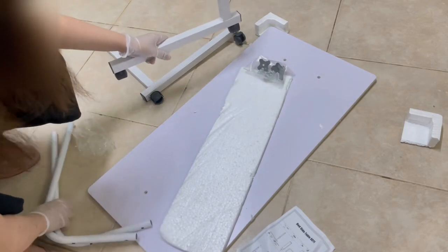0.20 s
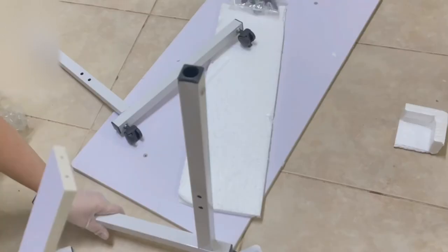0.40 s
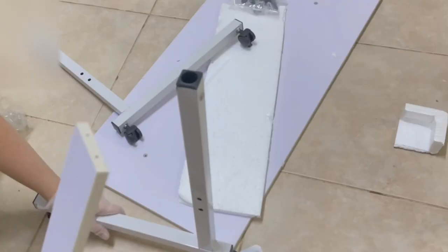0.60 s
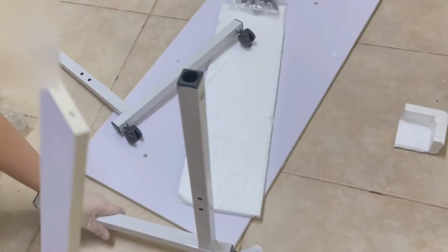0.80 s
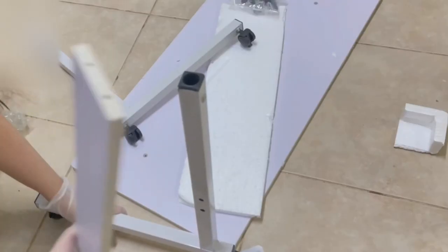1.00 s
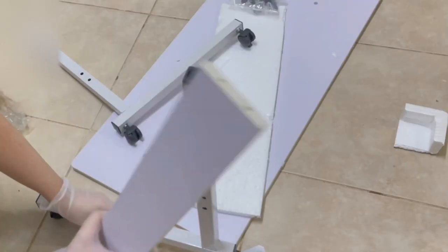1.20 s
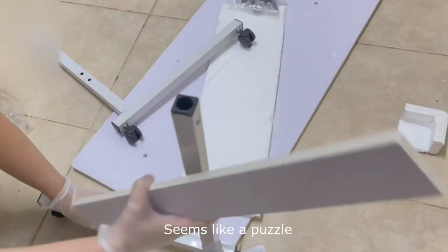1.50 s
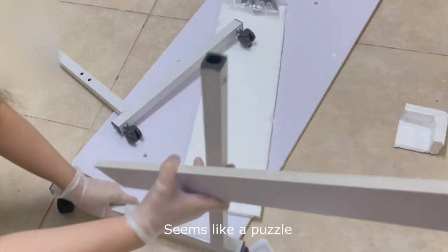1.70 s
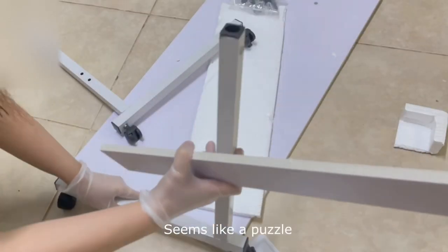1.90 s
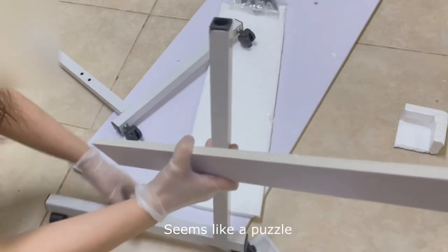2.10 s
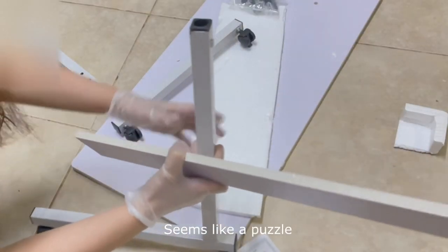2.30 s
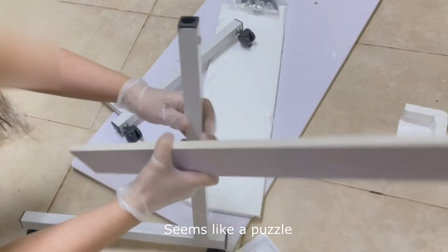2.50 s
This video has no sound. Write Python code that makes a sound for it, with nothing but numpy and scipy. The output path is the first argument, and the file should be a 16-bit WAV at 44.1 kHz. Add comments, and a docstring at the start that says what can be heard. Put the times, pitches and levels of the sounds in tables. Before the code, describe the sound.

Steel tubes clash with a bright ringing clank that stops short, then quiet panel taps and rubs

```python
"""A desk frame is put together on a tiled floor in a small hard room, close to the microphone.
Over room air and a faint steady hum a part shifts: contacts on the tiles ring its steel.
Two steel tubes clash and ring as decaying modes; the ring breaks off short. A low drone climbs in pitch.
Gloves slide (rough noise), then a panel is swung into place: it taps and rubs the leg and fittings click."""
import sys
import numpy as np
from scipy import signal
from scipy.fft import rfft, irfft, next_fast_len
from scipy.io import wavfile
from scipy.ndimage import map_coordinates

SR = 44100
rng = np.random.default_rng(int(sys.argv[2]) if len(sys.argv) > 2 else 0)


def materialize(psi):
    """Save the field psi as 16-bit PCM at rate SR to the path in sys.argv[1].

    A 1-D psi becomes a single channel; in a 2-D psi each row is a channel.
    """
    bounded = np.clip(np.atleast_2d(psi).T, -1, 1)
    quanta = np.round(bounded * 32767).astype(np.int16)
    wavfile.write(sys.argv[1], SR, quanta)


N = 114660
TOP_HZ = 15900

# spectrum of the tubes' dense clatter: f/Hz, level/dB
CLATTER_SPECTRUM = [(200, -20.5), (620, -10), (1300, -2), (1900, -9), (2500, -3), (3600, -4), (3850, -15),
                    (4250, -25), (4600, 1.5), (7400, -2), (8900, 4), (9900, -1), (10400, -28), (12200, -9),
                    (13200, -50)]
# spectrum of panel against leg, knocking or rubbing: f/Hz, level/dB
PANEL_SPECTRUM = [(120, -24), (750, -4.5), (1600, 2), (2900, 0), (4000, -9), (6000, -19), (9600, -20),
                  (10500, -55)]


def amp(db):
    """Amplitude factor of a level in dB."""
    return 10 ** (np.asarray(db) / 20)


def unit(x):
    """x scaled to rms 1."""
    return x / np.sqrt(np.mean(x ** 2) + 1e-20)


def along(points, hz):
    """(Hz, value) points interpolated on a log frequency axis."""
    f, v = np.transpose(points)
    return np.interp(np.log(hz + 1), np.log(f + 1), v)


def clock():
    """Time of each sample in s."""
    return np.arange(N) / SR


def filtered(x, response):
    """x times a response of frequency."""
    m = next_fast_len(N + SR // 2)
    hz = np.fft.rfftfreq(m, 1 / SR)
    return irfft(rfft(x, m) * response(hz), m)[..., :N]


def pan(left_db):
    """Channel gains with the left left_db above the right."""
    return amp(np.array([[left_db], [-left_db]]) / 2)


def noise(spectrum, alike):
    """Coloured stereo noise of rms 1; alike is the channel correlation."""
    mid, side = filtered(rng.standard_normal((2, N)), lambda hz: amp(along(spectrum, hz)))
    turn = np.arccos(np.clip(alike, 0, 1)) / 2
    return unit(np.cos(turn) * mid + np.sin(turn) * np.array([side, -side]))


def wobble(rate_hz):
    """A smooth random curve, rate_hz knots a second."""
    knots = rng.standard_normal(int(N * rate_hz / SR) + 4)
    return map_coordinates(knots, [clock() * rate_hz])


def struck(start_s, t60_s, attack_s=0.00027):
    """Envelope of a blow: a quick rise, then a steady decay."""
    t = np.maximum(clock() - start_s, 0)
    return (1 - np.exp(-t / attack_s)) * np.exp(-np.log(1000) * t / t60_s)


def friction(strokes, spectrum, rough_db):
    """Strokes that swell and fade, grainy from sticking and slipping."""
    t = clock()
    power = 0
    for peak_s, db, rise_s, fall_s in strokes:
        drop_db = 20 * np.maximum((peak_s - t) / rise_s, (t - peak_s) / fall_s)
        power = power + amp(db - drop_db) ** 2
    grain = amp(rough_db * wobble(rate_hz=400))
    return np.sqrt(power) * unit(noise(spectrum, alike=.6) * grain)


def room(x):
    """The room's answer: a noise tail, each frequency dying at its own speed."""
    # decay of the room: f/Hz, t60/s
    room_decay = [(150, 0.42), (1000, .42), (3000, .42), (9000, .28)]
    hz, t, z = signal.stft(rng.standard_normal((2, SR // 2)), SR, nperseg=256)
    decay = np.exp(-np.log(1000) * t / along(room_decay, hz)[:, None])
    tail = signal.istft(z * decay, SR, nperseg=256)[1]
    build_up = 1 - np.exp(-np.arange(tail.shape[1]) / SR / .004)
    tail = tail * build_up
    return signal.fftconvolve(x, tail / np.linalg.norm(tail[0]), axes=1)[:, :N]


def tubes():
    """Each contact rings the tubes' modes, with a crack and dense clatter; reflections make the lines waver."""
    # tube modes: f/Hz, level touched at the tip/dB, level struck full on/dB, t60/s, left over right/dB
    tube_modes = [(661, -45.5, -41, .6, 10), (1340, -42, -24, .35, 13.5), (1627, -32.5, -37, .4, 5.5),
                  (2183, -34.5, -32.5, 2.5, 7), (2417, -33, -23.5, 0.37, 2), (2453, -34, -28, .4, 1),
                  (2640, -30, -30, 0.53, 10), (3190, -46, -25.5, 1.0, 7), (3579, -21.5, -24.5, 0.58, 6),
                  (3620, -33, -26, 0.33, 10), (4560, -24.5, -21.5, .32, 2.5), (4651, -35, -26, .9, 6),
                  (5600, -27, -44, .2, 1), (6290, -47, -33, .4, 1), (6740, -49, -33, .6, 7),
                  (7527, -31.5, -33.5, 1.1, 2.5), (8103, -27, -21.5, .4, 0.5), (8690, -23.5, -33, .24, 0),
                  (8793, -30, -17.5, 0.47, -0.5), (9314, -18, -29, 0.18, 0), (9740, -25, -35, 0.32, 0),
                  (12110, -45, -30.5, .2, -0.5)]
    # tube contacts: t/s, level/dB, place (0 tip to 1 full on), clatter level/dB
    contacts = [(0.2116, 1, 0, -28), (0.2412, 1, 1, -21.5), (.267, -8, 0.82, -23), (.311, -15, 0.93, -29.5)]
    # thuds of the frame's weight: t/s, level/dB
    thud_events = [(.243, -24), (.312, -32)]
    # spectra of thud and crack: f/Hz, level/dB
    thud_spectrum = [(60, -20), (550, -6), (950, -7), (1350, 4), (1800, -9), (4000, -35)]
    crack_spectrum = [(500, -24), (3400, -3), (4200, -26), (8900, 0), (15800, -24)]
    crack_db, crack_t60_s = -17.5, 0.032
    wash_db = -3.5  # diffuse noise under the weak modes

    t, ring = clock(), np.zeros((2, N))
    for hz, tip_db, full_db, t60_s, left_db in tube_modes:
        power = 0
        for s, db, full, _ in contacts:
            mode_db = db + tip_db + full * (full_db - tip_db)
            power = power + (amp(mode_db) * struck(s, t60_s, attack_s=.0008)) ** 2
        phase = 2 * np.pi * (hz * t + rng.random()) + .22 * wobble(rate_hz=55) + rng.normal(0, .4, (2, 1))
        gains = pan(left_db) / pan(left_db).mean()
        ring += gains * np.sqrt(power) * amp(1.7 * wobble(rate_hz=60)) * np.sin(phase)

    clatter_power = sum((amp(db) * struck(s, t60_s=.42, attack_s=.0015)) ** 2 for s, _, _, db in contacts)
    clatter = unit(weak_modes() + amp(wash_db) * noise(CLATTER_SPECTRUM, alike=0.5))
    clatter = np.sqrt(clatter_power) * clatter
    crack = sum(amp(crack_db + db) * struck(s, crack_t60_s) for s, db, _, _ in contacts)
    crack = crack * noise(crack_spectrum, alike=.7)
    thud = sum(amp(db) * struck(s, t60_s=.09, attack_s=0.0022) for s, db in thud_events)
    thud = thud * noise(thud_spectrum, alike=0.53)
    return ring + pan(left_db=3) * (clatter + crack + thud)


def weak_modes():
    """A crowd of unevenly spaced partials of random strength."""
    spacing_hz = 54.94  # mean
    slots = np.arange(int(TOP_HZ / spacing_hz))
    place, size, turn = rng.random((len(slots), 3)).T
    lines = np.zeros(N // 2 + 1, complex)
    bins = ((slots + place) * spacing_hz * N / SR).astype(int)
    lines[bins] = size * np.exp(2j * np.pi * turn)
    return unit(filtered(irfft(lines, N), lambda hz: amp(along(CLATTER_SPECTRUM, hz))))


def taps():
    """The hand-damped panel knocks the leg: a very short ring and a crack; the fittings click."""
    # panel taps: t/s, ring level/dB, ring f/Hz, ring t60/s, crack level/dB
    tap_events = [(1.5732, -19, 2098, 0.0076, -38), (1.9865, -32.5, 1500, 0.01, -44.5),
                  (1.9905, -30, 2480, 0.016, -42), (2.174, -41, 2100, 0.0083, -56),
                  (2.3273, -28.5, 2290, 0.019, -53), (2.37, -34, 2380, 0.011, -45),
                  (2.430, -34.5, 4370, 0.013, -43), (2.4417, -25.5, 1860, 0.011, -31.5),
                  (2.446, -32, 2720, 0.018, -33.5), (2.4807, -28, 1317, 0.017, -29.5),
                  (2.485, -37.5, 650, 0.023, -36.5), (2.489, -44, 3150, 0.14, -38),
                  (2.535, -40, 1800, .007, -48)]
    # sharp clicks of the fittings: t/s, level/dB
    click_events = [(2.3274, -36.5), (2.442, -42), (2.481, -45)]
    # click spectrum: f/Hz, level/dB
    click_spectrum = [(1000, -22), (3500, 3), (6000, -7), (9600, 3.5), (13000, -38.5)]
    snap_room_db, ring_room_db = -4.5, -13

    t, ring = clock(), 0
    for s, db, hz, t60_s, _ in tap_events:
        ring = ring + amp(db) * struck(s, t60_s) * np.sin(2 * np.pi * hz * (t - s))
    crack = sum(amp(db) * struck(s, t60_s=0.016, attack_s=0.0004) for s, _, _, _, db in tap_events)
    crack = crack * noise(PANEL_SPECTRUM, alike=.9)
    clicks = sum(amp(db) * struck(s, t60_s=0.0222) for s, db in click_events)
    clicks = clicks * noise(click_spectrum, alike=.7)
    snap = pan(left_db=4.0) * (crack + clicks)
    return ring + snap + room(amp(snap_room_db) * snap + amp(ring_room_db) * ring)


def panel_rubs():
    """The panel rubs along the leg: rough friction noise."""
    # rubs: peak t/s, level/dB, rise/s per 20 dB, fall/s per 20 dB
    rub_strokes = [(1.585, -51.5, 0.069, 0.23), (1.997, -45.5, .008, 0.09), (2.162, -57.5, 0.028, 0.19),
                   (2.362, -50, 0.036, 0.22), (2.485, -48.5, 0.085, 0.02)]
    return friction(rub_strokes, PANEL_SPECTRUM, rough_db=2.5)


def glove_slides():
    """Gloves slide: smoother, brighter friction noise."""
    # slides: peak t/s, level/dB, rise/s per 20 dB, fall/s per 20 dB
    slide_strokes = [(.19, -54.5, 0.065, 0.15), (.868, -56.5, 0.014, 0.6), (.958, -48, 0.073, 0.06),
                     (1.088, -56, 0.11, 0.09), (1.555, -60, 0.031, 0.22), (1.71, -60.5, 0.15, 0.16),
                     (2.34, -54.5, 0.045, 0.43), (2.48, -56, 0.08, 0.27)]
    # glove spectrum: f/Hz, level/dB
    glove_spectrum = [(300, -12), (1500, -7.5), (4400, -3), (6800, -6), (9400, 4), (10200, -15),
                      (13000, -38)]
    return friction(slide_strokes, glove_spectrum, rough_db=1.0)


def shifting_part():
    """A quick run of contacts on the tiles rings the steel part as it drags."""
    # contacts on the floor: t/s, level/dB
    shift_events = [(0.0342, -33.5), (0.0412, -34), (0.05, -36)]
    # contact and drag spectrum: f/Hz, level/dB
    shift_spectrum = [(150, -16.5), (660, -2.5), (1000, -5), (1420, 0.5), (2600, -2), (4150, -19),
                      (4800, -6.5), (9800, -9), (10500, -50)]
    # the part's own ring: f/Hz, level against the contact/dB
    part_modes = [(1430, -15), (2654, -13), (3655, -15.5), (4888, -19.5)]
    # drag: peak t/s, level/dB, rise/s per 20 dB, fall/s per 20 dB
    drag_stroke = (-0.04, -56, 0.15, 0.3)
    room_db = -8

    dry = sum(amp(db) * struck(s, t60_s=.07, attack_s=0.00059) for s, db in shift_events)
    dry = dry * noise(shift_spectrum, alike=0.72)
    fading = np.sqrt(sum((amp(db) * struck(s, t60_s=.22)) ** 2 for s, db in shift_events))
    ring = 0
    for hz, db in part_modes:
        ring = ring + amp(db) * np.sin(2 * np.pi * hz * clock() + .5 * wobble(rate_hz=40))
    drag = friction([drag_stroke], shift_spectrum, rough_db=2)
    return pan(left_db=4) * (dry + fading * ring + amp(room_db) * room(dry) + drag)


def background():
    """Room air as noise, a faint machine hum as wavering tones, and a low drone that climbs in pitch."""
    # air spectrum: f/Hz, level/dB
    air_spectrum = [(35, -1), (70, 6.5), (120, -4), (272, -3.5), (500, -12.5), (870, -11), (1250, -17.5),
                    (1600, -26), (2900, -19.5), (3300, -29), (3900, -25.5), (5500, -45), (9200, -34),
                    (10500, -52)]
    # hum tones: f/Hz, mid level/dB
    hum_tones = [(896, -74), (2880, -77)]
    # drone, perhaps a far engine gathering speed: t/s, f/Hz, level before a 1 dB cut/dB
    drone_course = [(.3, 42, -63), (.42, 42, -55), (.8, 43, -59), (1.1, 50, -60), (1.64, 57.4, -48.5),
                    (1.8, 59, -57), (2.6, 63, -56)]
    air_db = -61

    t, hum = clock(), 0
    for hz, db in hum_tones:
        level = amp(db + 2 * wobble(rate_hz=10)) * np.sqrt(2)
        hum = hum + level * np.sin(2 * np.pi * hz * t + .6 * wobble(rate_hz=20))
    s, *columns = np.transpose(drone_course)
    drone_hz, drone_db = (np.interp(t, s, c) for c in columns)
    drone_level = amp(drone_db - 1 + 3 * wobble(rate_hz=14)) * np.sqrt(2)
    drone = drone_level * np.sin(2 * np.pi * np.cumsum(drone_hz) / SR)
    return pan(left_db=2.05) * (amp(air_db) * noise(air_spectrum, alike=0.55) + hum + drone)


def scene():
    """Tubes and shifting part break off to a faint fading remnant; the other sounds run throughout."""
    cut_s, leak_db = 0.3596, -21.5
    t = clock()
    gate = np.clip((cut_s - t) / .0015 + .5, 0, 1)
    leak = amp(leak_db) * np.exp(-np.maximum(t - cut_s, 0) / 0.0066)
    broken_off = np.maximum(gate, leak) * (tubes() + shifting_part())
    return broken_off + taps() + panel_rubs() + glove_slides() + background()


def record(dry):
    """Two close microphone ports, differing in phase, and a steep band limit."""
    # port phase: f/Hz, left lead/rad
    port_phase = [(400, 0.23), (1400, 1.3), (2500, 1.3), (3200, -.1), (7600, .1), (9400, -1.5), (12000, 0)]
    sides = np.array([[1], [-1]])
    return filtered(dry, lambda hz: np.exp(.5j * along(port_phase, hz) * sides) * (hz < TOP_HZ))


dry = scene()
out = record(dry)
materialize(out)
```